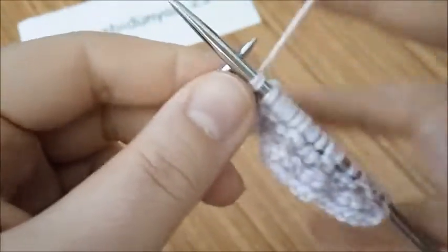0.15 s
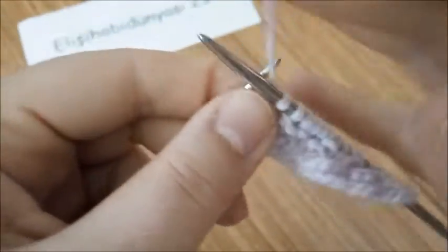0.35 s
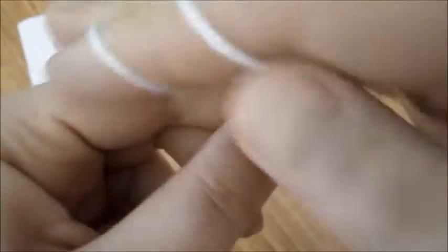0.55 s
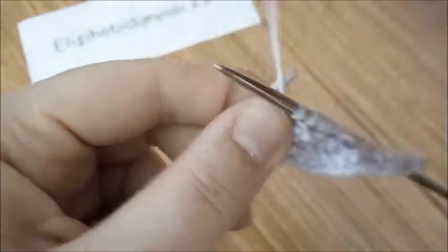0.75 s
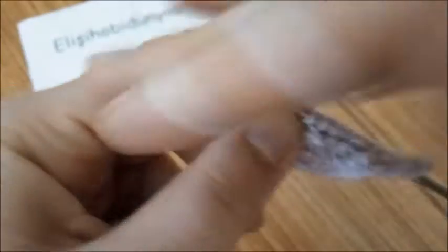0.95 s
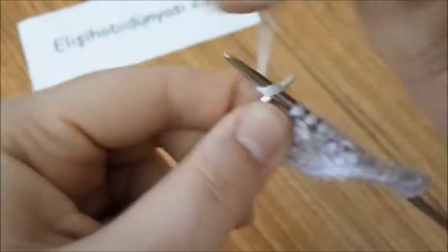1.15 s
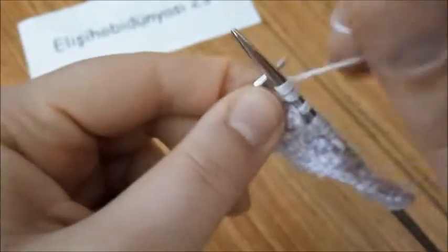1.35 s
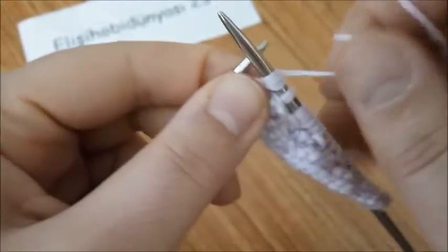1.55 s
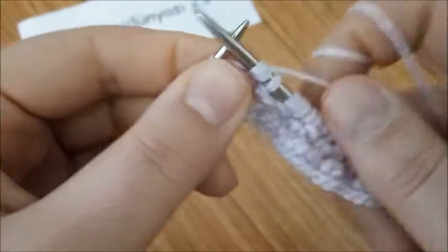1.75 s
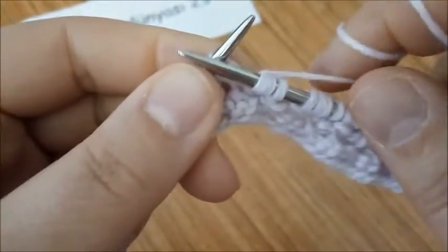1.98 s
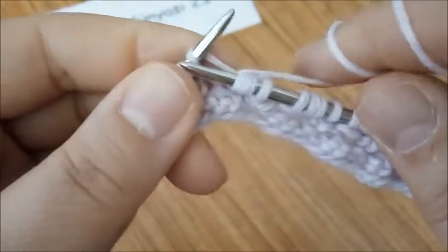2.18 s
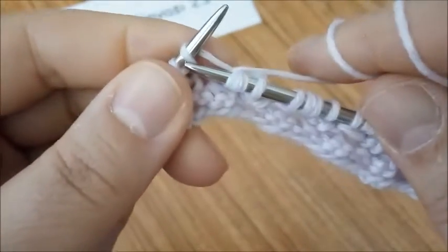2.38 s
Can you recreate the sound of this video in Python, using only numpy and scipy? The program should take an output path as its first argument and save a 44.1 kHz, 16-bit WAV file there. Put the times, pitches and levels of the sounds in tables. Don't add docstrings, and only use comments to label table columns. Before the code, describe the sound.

Metal knitting needles give a loud bright click at 0.35 seconds, then a click and gritty skid at 0.49, with duller scrapes and rubbing until 0.7. Soft sliding leads to a strong click with a deep table thud at 1.2. Lighter clicks follow at 1.32-1.38 and a quick bouncing cluster at 1.61-1.68. Faint ticks near 1.8 and 1.95 fade into hiss, low hum and a barely audible whistle.

```python
import sys
import numpy as np
from scipy import signal
from scipy.fft import rfft, irfft, next_fast_len
from scipy.io import wavfile
from scipy.ndimage import map_coordinates

SR = 44100
rng = np.random.default_rng(int(sys.argv[2]) if len(sys.argv) > 2 else 0)


def transcribe(signal):
    frames = np.atleast_2d(signal).T
    limited = np.clip(frames, -1, 1)
    pcm = np.round(limited * 32767).astype(np.int16)
    wavfile.write(sys.argv[1], SR, pcm)


def rack_gain(trim_db):
    fader = np.asarray(trim_db, float)
    return 10 ** (fader / 20)


N = 106854
RING_SAMPLES = SR // 12
RING_DB = -11.5
CATCH_S = 0.012


def unit(x):
    return x / np.sqrt(np.mean(x ** 2) + 1e-20)


def along(points, hz):
    f, v = np.transpose(points)
    return np.interp(np.log(hz + 1), np.log(f + 1), v)


def at_time(rows, s):
    when, *columns = np.transpose(rows)
    return [np.interp(s, when, column) for column in columns]


def filtered(x, response):
    m = next_fast_len(x.shape[-1] + 4096)
    spectrum = rfft(x, m) * response(np.fft.rfftfreq(m, 1 / SR))
    return irfft(spectrum, m)[..., :x.shape[-1]]


def wobble(rate):
    knots = rng.standard_normal(int(N * rate / SR) + 4)
    return map_coordinates(knots, [np.arange(N) * rate / SR])


def pan(db):
    return rack_gain(np.minimum(0, np.multiply.outer([1, -1], db)))


def hiss():
    # (frequency [Hz], level [dB])
    hiss_colour = [(300, 5), (600, 0.5), (1500, -2.5), (6500, -3.5), (7600, -10), (13800, -15.5),
                   (14400, -4), (15500, -5.5)]
    noise = rng.standard_normal((2, N))
    return rack_gain(-63.5) * unit(filtered(noise, lambda hz: rack_gain(along(hiss_colour, hz)) * (hz < 15750)))


def hum():
    # (frequency [Hz], level [dB])
    hum_colour = [(20, -12), (45, -5), (75, 0), (110, -4), (160, -8.5), (210, -13.5), (270, -4.5),
                  (400, -16), (700, -21.5), (1200, -82.5)]
    # (time [s], level [dB])
    swell = [(0, 0), (.35, -0.5), (.6, 7), (.8, -0.5), (1.5, 0.5), (1.9, -1), (2.1, -6.5), (2.42, 1)]
    level_db, sway_db, alike = -64.5, 1.5, 0.77
    a, b = filtered(rng.standard_normal((2, N)), lambda hz: rack_gain(along(hum_colour, hz)))
    angle = np.arccos(alike) / 2
    common, apart = np.cos(angle) * a, np.sin(angle) * b
    sides = unit(np.array([common + apart, common - apart]))
    swell_db = np.interp(np.arange(N) / SR, *np.transpose(swell))
    return rack_gain(level_db + swell_db + sway_db * wobble(6.17)) * sides


def whine():
    centre_hz, width_hz = 9200, 82
    noise = rng.standard_normal(N)
    band = filtered(noise, lambda hz: np.exp(-((hz - centre_hz) / width_hz) ** 2))
    return rack_gain(-82.5) * unit(band) * np.array([[0], [1]])


def ring(t, hz, db, t60, pan_db, rise_s):
    t = np.maximum(t, 0)
    phase = np.array([[1], [-1]]) * rng.uniform(0, np.pi / 2)
    shape = rack_gain(db - 60 * t / t60) * (1 - np.exp(-(t / rise_s) ** 2))
    return pan(pan_db)[:, None] * shape * np.sin(2 * np.pi * hz * t + phase)


def modes(t, rows, db, scatter_db=0, rise_s=0.00057):
    return sum(ring(t, hz, db + d + scatter_db * rng.normal(), t60, p, rise_s) for hz, d, t60, p in rows)


def caught(t, after_s, loss_db):
    return rack_gain(loss_db * (1 - np.exp(-(t / after_s) ** 4)))


def needle(t, s, db):
    bend_hz = [2075, 2905, 3860, 5000, 6280, 7545, 8910, 10480, 12300, 15100]
    # (level [dB], t60 [s], left-right difference [dB])
    bend_rows = [(-16.5, 0.1, -15), (-11.5, 0.066, -11), (0.5, 0.034, -12), (0.5, 0.027, -13),
                 (10, 0.0073, -4), (2.5, 0.012, -27), (-2.5, 0.019, -22), (-7.5, 0.016, -13),
                 (-12, 0.0069, -6), (-27, 0.011, -8)]
    # (time [s], 2.9 kHz mode [dB], 5 kHz mode [dB], 6-7.5 kHz modes [dB], higher modes [dB])
    grip = [(.352, -13, 3, 1.5, 5), (.489, -12, 9.5, 6.5, 4), (.6, 0, 0, 11.5, 6), (.68, -2, 0, 12.5, 8),
            (1.11, -9, -4, -8, 4), (1.195, -3.5, -10.5, -1, -0.5), (1.325, 5, 1, -5.5, -6),
            (1.364, 10, -1, -3, 0), (1.615, 6, 2, 1.5, 2.5), (1.644, 17, 8.5, 3, -1), (1.82, 3, -8, 3, 8.5)]
    grip_column = [0, 1, 0, 2, 3, 3, 4, 4, 4, 4]
    grip_db = [0] + at_time(grip, s)
    shell_hz = rng.uniform(2750, 9500, size=24)
    shell = [(hz, -12.5, 0.03, -15) for hz in shell_hz]  # (Hz, dB, t60 s, left-right dB)
    bends = [(hz, d + grip_db[k], t60, p) for hz, (d, t60, p), k in zip(bend_hz, bend_rows, grip_column)]
    head = t[:RING_SAMPLES]
    sound = modes(head, bends + shell, db) * caught(head, CATCH_S, -14.5)
    return np.pad(sound, ((0, 0), (0, len(t) - len(head))))


def shaft(t, upper_db, lower_db, middle_db, lowest_db, stretch):
    # (frequency [Hz], level [dB], t60 [s], left-right difference [dB])
    upper = [(1794, 3, 0.041, 22), (1380, -13.5, 0.064, 1.5)]
    # (frequency [Hz], level [dB], t60 [s], left-right difference [dB])
    lower = [(952, 3.5, 0.084, 11), (516.6, 1, 0.084, 19.5)]
    shaft_db, rise_s = 2.5, 0.00073
    sound = modes(t * stretch, upper, upper_db + shaft_db, 1, rise_s)
    sound += modes(t, lower, lower_db + shaft_db, 1.5, rise_s)
    sound += ring(t, 1578, lower_db + middle_db, 0.029, 15.5, rise_s)
    sound += ring(t, 401.4, lower_db + lowest_db, 0.089, 21, rise_s)
    return sound * caught(t, 0.0096, -7)


def table(t, s, upper_db, lower_db, thud_db):
    # (time [s], thud [Hz], free board ring [dB], middle shaft mode [dB], lowest shaft mode [dB])
    hand = [(.35, 345, 13.5, 18.5, 5), (.49, 295, 6.5, 11, -5), (.7, 299, -4, -4, 9),
            (1.11, 300, -9, 3, -5.5), (1.19, 271, -14.5, 13, 14), (1.33, 251, -8.5, 9.5, 0),
            (1.38, 260, 4.5, 7, 8), (1.615, 304, 7, 2, 12), (1.63, 318, 3, -4, 22.5), (1.644, 318, 4, 9, 9),
            (1.68, 305, -1, 1, -6)]
    # (time [s], pitch [ratio])
    shaft_bend = [(.35, 0.98), (1.2, 1), (1.33, 0.97), (1.62, 1.011), (1.65, 0.96)]
    # (frequency [Hz], level [dB], t60 [s], left-right difference [dB])
    board = [(297.9, -3, 0.22, 16), (263, -19.5, 0.47, 21.5)]
    level_db, pan_db, rise_s, stop_s = 10.5, 21.5, 0.0065, 0.016
    hz, free_db, middle_db, lowest_db = at_time(hand, s)
    stretch = np.interp(s, *np.transpose(shaft_bend))
    shaft_sound = shaft(t, upper_db, lower_db, middle_db, lowest_db, stretch)
    late_tone = ring(t - 0.00521, 1058, lower_db + 11.5, 0.028, -35, 0.0073)
    thud = ring(t, hz, thud_db + level_db, 0.09, pan_db, rise_s)
    thud *= np.exp(-(t / stop_s) ** 4)
    thud += sum(ring(t, f, thud_db + free_db + d, t60, p, rise_s) for f, d, t60, p in board)
    overtone = ring(t, 529.2, thud_db + level_db - 25, 0.12, pan_db, 0.00054)
    return shaft_sound + late_tone + thud + overtone


def click(t, s, ring_db, upper_db, lower_db, thud_db):
    crack_db = ring_db + RING_DB - 6 - 60 * t / 0.0012
    crack = np.diff(rng.standard_normal((2, len(t) + 1))) * rack_gain(crack_db) * pan(6.0)[:, None]
    frame = ring(t, 125.8, ring_db - 26.5, 0.25, 2.2, 0.03)
    ringing = needle(t, s, ring_db + RING_DB)
    return crack + ringing + table(t, s, upper_db, lower_db, thud_db) + frame


def room(x):
    # (frequency [Hz], t60 [s])
    room_t60 = [(250, 0.19), (1000, 0.4), (4000, 0.21), (9000, 0.28), (14000, 0.12)]
    # (frequency [Hz], level [dB])
    room_colour = [(200, 15), (650, -1), (980, 11.5), (1800, -4), (3100, 7), (4200, -1.5), (9000, -4.5),
                   (12000, -13)]
    # (frequency [Hz], left-right difference [dB])
    room_pan = [(300, 25.5), (1000, 0), (4000, -2), (9000, -13)]
    delay_s, rise_s = 0.0099, 0.003
    wall_s, wall_spread_s, wall_gain = 0.036, 0.0027, 0.82
    hz, t, z = signal.stft(rng.standard_normal((2, SR // 3)), SR, nperseg=256)
    colour = rack_gain(along(room_colour, hz)) * pan(along(room_pan, hz))
    fade = rack_gain(-60 * t / along(room_t60, hz)[:, None])
    tail = signal.istft(z * colour[..., None] * fade, SR, nperseg=256)[1]
    age = np.arange(tail.shape[1]) / SR
    onset = np.clip((age - delay_s) / rise_s, 0, 1)
    wall = wall_gain * np.exp(-((age - wall_s) / wall_spread_s) ** 2)
    tail = tail * (onset + wall)
    tail = tail / np.linalg.norm(tail[0])
    blow = (0.53 * x[0] + x[1]) * rack_gain(-60 * np.arange(x.shape[1]) / SR / 0.014)
    return rack_gain(-9) * signal.fftconvolve(blow[None, :RING_SAMPLES], tail, axes=1)


def slide():
    # (time [s], rise [s], fall [s], level [dB], top frequency [Hz])
    strokes = [(0.522, 0.046, 0.031, -43.5, 5160), (.6, 0.045, 0.085, -54.5, 4530),
               (0.689, 0.048, 0.023, -49, 3850), (0.829, 0.095, 0.059, -59, 3440),
               (1.0, 0.089, 0.083, -57, 3460), (1.05, 0.12, 0.017, -50.5, 2860),
               (1.123, 0.018, 0.033, -57, 4000), (1.4, 0.042, 0.029, -66, 1730),
               (1.53, 0.026, 0.049, -66, 1500), (1.679, 0.13, 0.05, -58.5, 4230),
               (2.33, 0.1, 0.11, -66, 2080)]
    # (frequency [Hz], level [dB])
    rub_colour = [(150, -8), (300, 1.5), (600, -16), (1100, -16), (2200, -7), (4000, -5.5), (9000, 2)]
    # (frequency [Hz], left-right difference [dB])
    rub_pan = [(200, 20.5), (1000, -1), (5000, -3.5)]
    # (frequency [Hz], width [Hz], level [dB])
    wood_modes = [(280, 16.8, -34.5), (520, 72, 29), (1094, 79, 28.5), (1780, 49, -2), (2023, 220, -3)]

    def wood(f):
        return abs(sum(rack_gain(d) * 1j * f * w / (c * c - f * f + 1j * f * w) for c, w, d in wood_modes))

    t, out = np.arange(N) / SR, 0
    for s, rise, fall, db, top_hz in strokes:
        def colour(hz):
            rub = rack_gain(along(rub_colour, hz)) * (1 + 0.85 * wood(hz))
            return rub * pan(along(rub_pan, hz)) / (1 + (hz / top_hz) ** 4)

        noise = rng.standard_normal((2, N)) + 0.5 * rng.standard_normal(N)
        swell = np.where(t < s, np.clip(1 + (t - s) / rise, 0, 1), np.exp(-((t - s) / fall) ** 2))
        out = out + rack_gain(db) * swell * unit(filtered(noise, colour))
    return out * rack_gain(0.5 + 3 * wobble(150))


def skid(t, s, scrape_db, shaft_db, thud_db, tilt_db):
    # (frequency [Hz], level [dB])
    scrape = [(250, -65), (600, -11), (1200, -26.5), (2500, -0.5), (4200, 3), (6300, 1), (9200, -15.5),
              (11500, -50), (14800, -7), (16200, -23)]
    # (frequency [Hz], left-right difference [dB])
    skid_pan = [(2500, -6), (4100, 2), (5000, -10.5), (9000, -1), (14800, 12)]
    hold_s, t60 = 0.0032, 0.048

    def colour(hz):
        tilt = tilt_db * np.log2(np.maximum(hz, 1500) / 4000)
        return rack_gain(along(scrape, hz) + tilt) * pan(along(skid_pan, hz))

    noise = rng.standard_normal((2, len(t))) + 0.61 * rng.standard_normal(len(t))
    grit = unit(filtered(noise, colour))
    shape = rack_gain(scrape_db - 7 - 60 * np.maximum(t - hold_s, 0) / t60) * np.minimum(1, t / 0.00046)
    ringing = needle(t, s, scrape_db + RING_DB - 10)
    return grit * shape * caught(t, CATCH_S, -11) + ringing + table(t, s, shaft_db, shaft_db - 5, thud_db)


def contacts():
    # (time [s], ring [dB], upper shaft [dB], lower shaft [dB], table [dB])
    clicks = [(0.352, -6.5, -19.5, -30.5, -42.5), (0.4887, -14, -31.5, -63, -64),
              (1.195, -11.5, -23, -43.5, -15), (1.3247, -30, -26.5, -31.5, -31.5),
              (1.3634, -36.5, -35.5, -38, -55), (1.38, -47, -57, -46.5, -55),
              (1.5219, -62, -89, -62.5, -69), (1.6146, -33.5, -30, -40.5, -43),
              (1.6439, -34, -33, -47.5, -47), (1.8219, -48, -76, -73, -65), (1.9452, -48.5, -90, -86, -90),
              (0.511, -34, -48, -40, -53), (1.6293, -49, -43.5, -55.5, -58), (1.666, -48, -49, -64, -60)]
    # (time [s], scrape [dB], shaft [dB], table [dB], brightness [dB per octave])
    skids = [
        (0.4886, -13.5, -28, -31.5, -2),
        (0.57, -22.5, -38.5, -35.5, -10),
        (0.6265, -34.5, -39.5, -45, -8.5),
        (0.6635, -30, -47.5, -42.5, -15.5),
        (0.6779, -38.5, -45, -40, -10.5),
        (1.1108, -39.5, -48.5, -43, -13.5),
        (1.6439, -30.5, -50, -46, -10),
        (1.6783, -43, -43.5, -45, -17),
    ]
    # (time [s], level [dB])
    openness = [(.35, -1.5), (.49, 3.5), (.6, 2.5), (1.19, -6), (1.36, -5.5), (1.62, 4)]
    out, t = np.zeros((2, N + SR)), np.arange(SR // 3) / SR
    for make, rows in ((click, clicks), (skid, skids)):
        for s, *levels in rows:
            direct = make(t, s, *levels)
            heard = room(direct) * rack_gain(np.interp(s, *np.transpose(openness)))
            heard[:, :len(t)] += direct
            out[:, round(s * SR):][:, :heard.shape[1]] += heard
    return out[:, :N]


def scene():
    return hiss() + hum() + whine() + contacts() + slide()


def band_limit(x):
    return signal.sosfilt(signal.butter(12, 16850, fs=SR, output="sos"), x)


def record(dry):
    low_hz, top_hz = 70, 16500
    band = filtered(dry, lambda hz: (hz < top_hz) * hz ** 2 / (hz ** 2 + low_hz ** 2))
    return band_limit(band)


dry = scene()
out = record(dry)
transcribe(out)
```